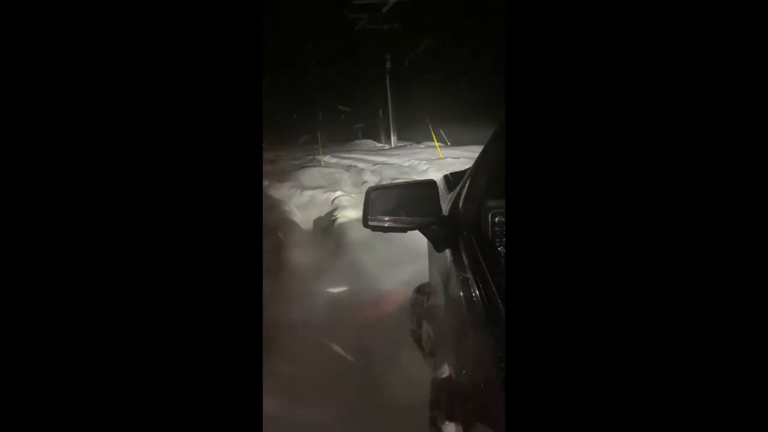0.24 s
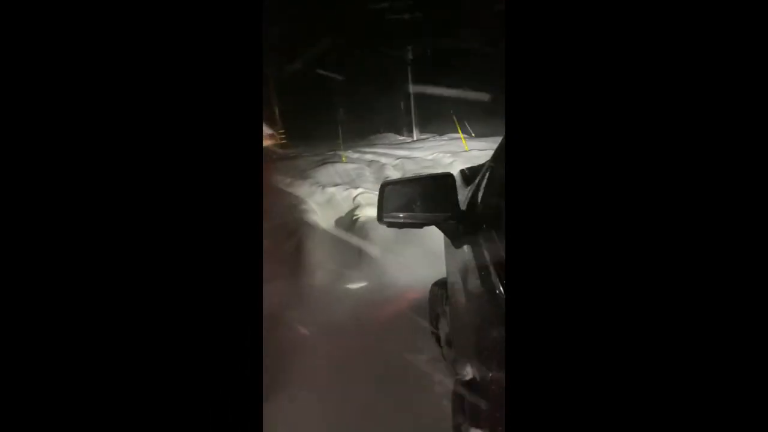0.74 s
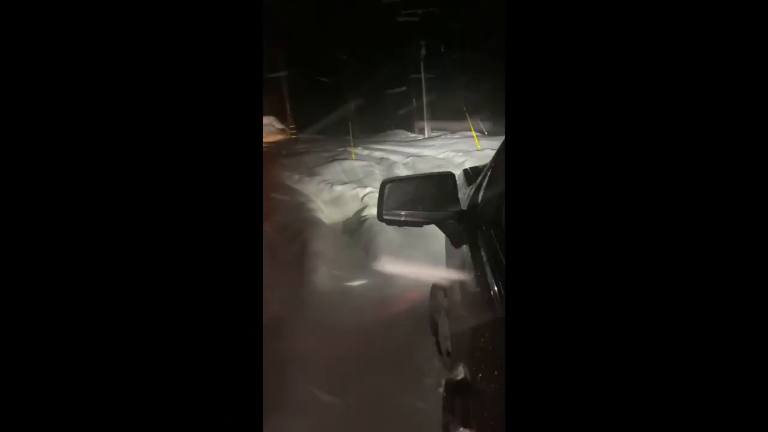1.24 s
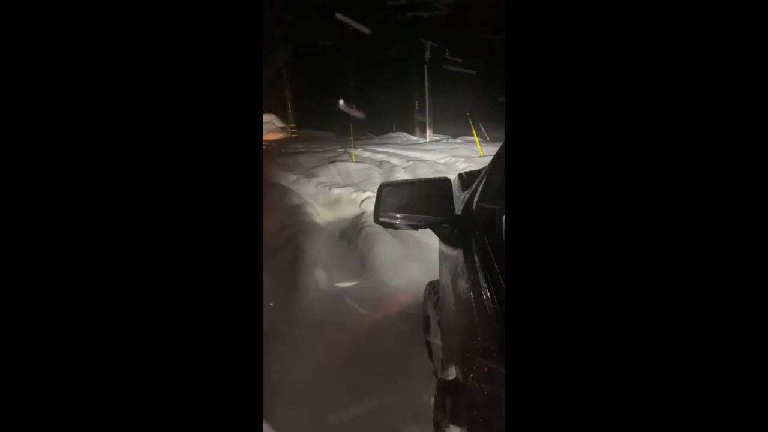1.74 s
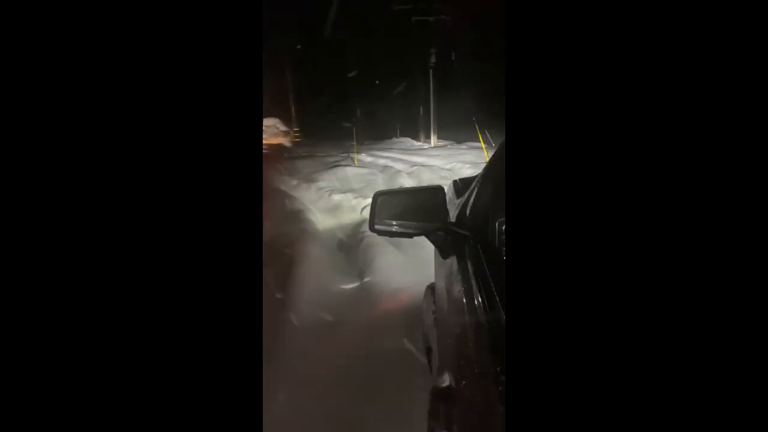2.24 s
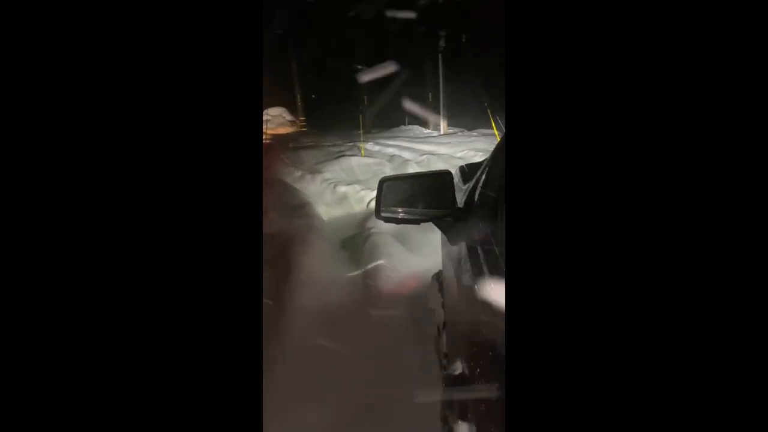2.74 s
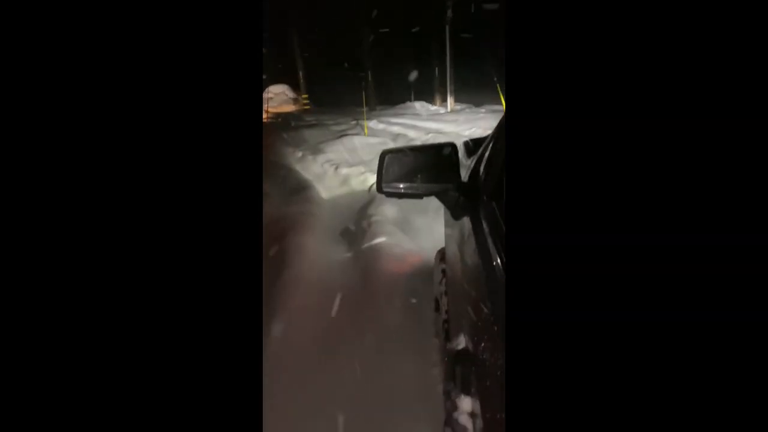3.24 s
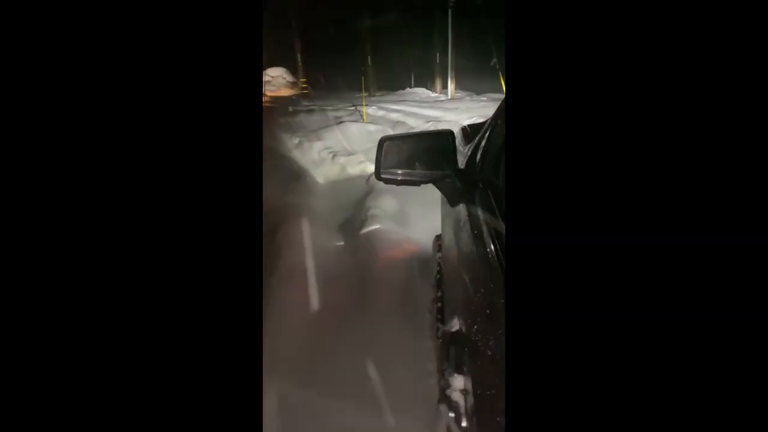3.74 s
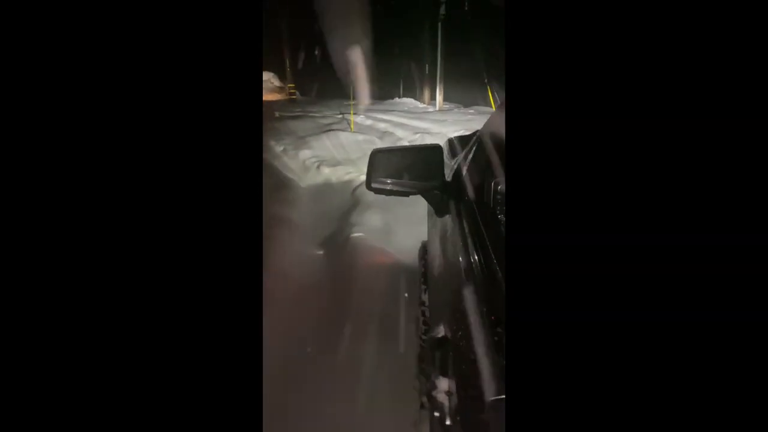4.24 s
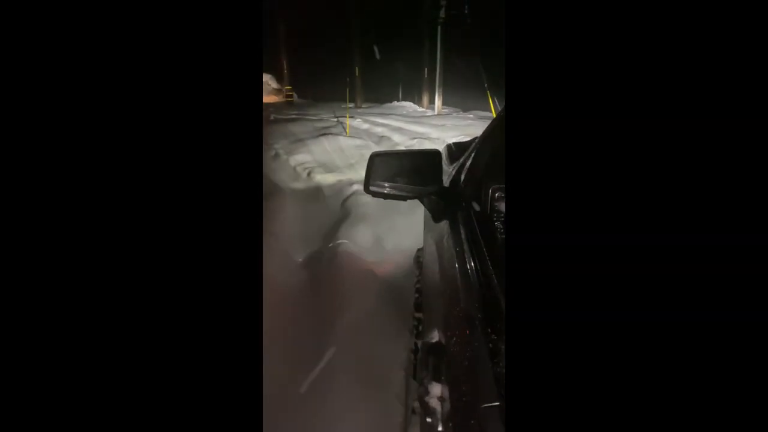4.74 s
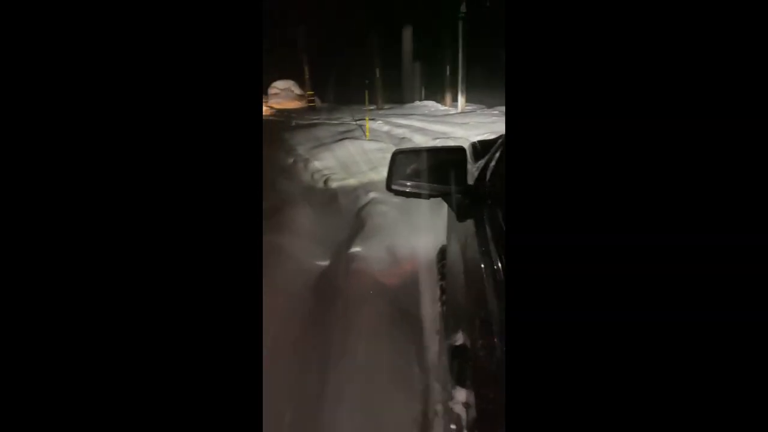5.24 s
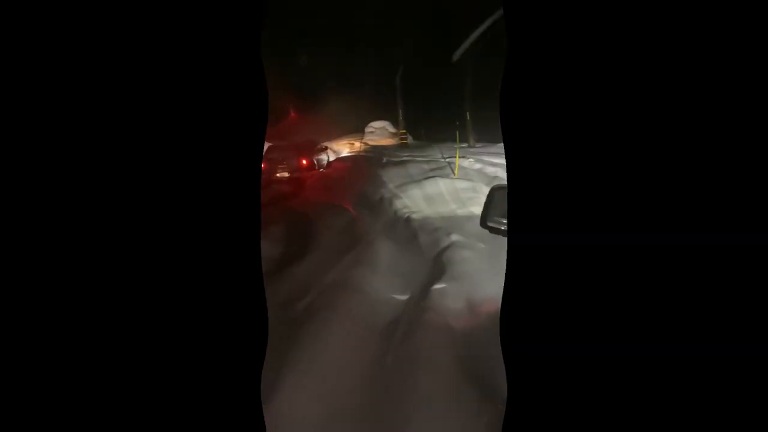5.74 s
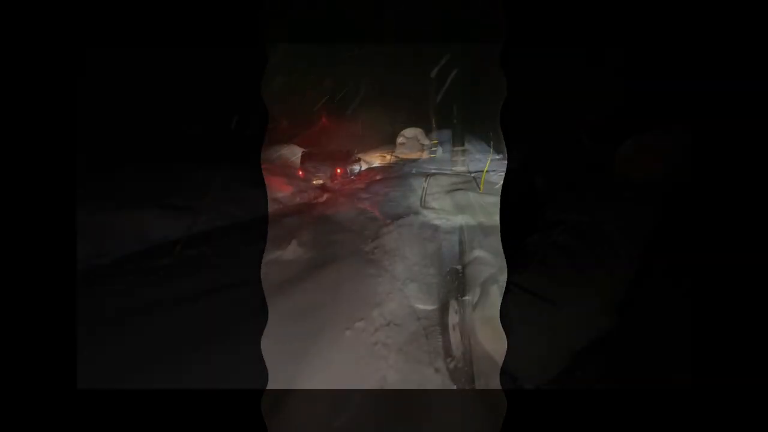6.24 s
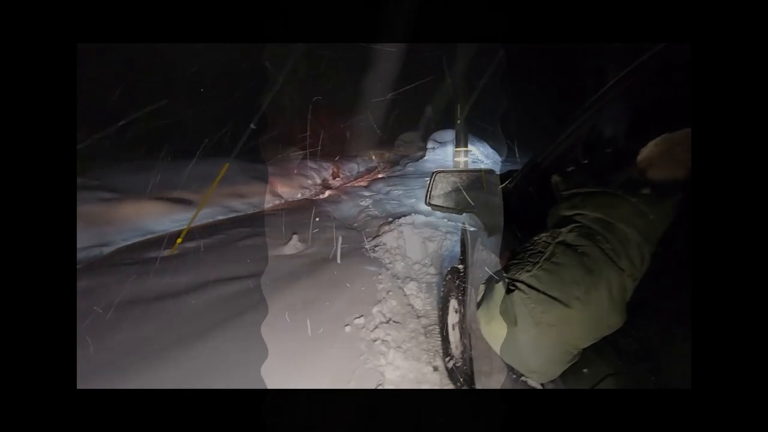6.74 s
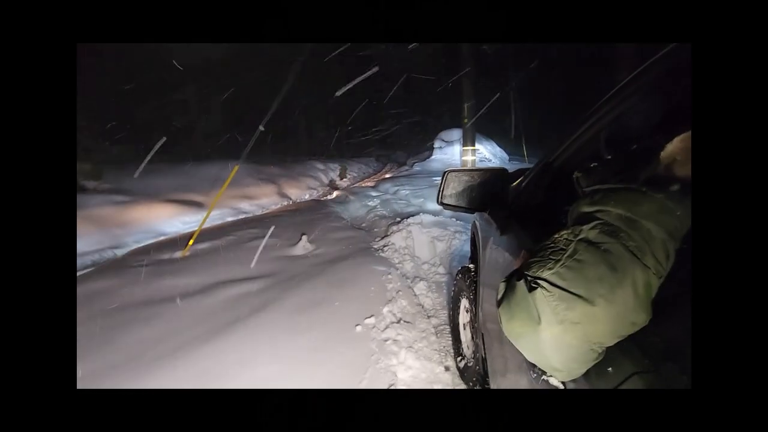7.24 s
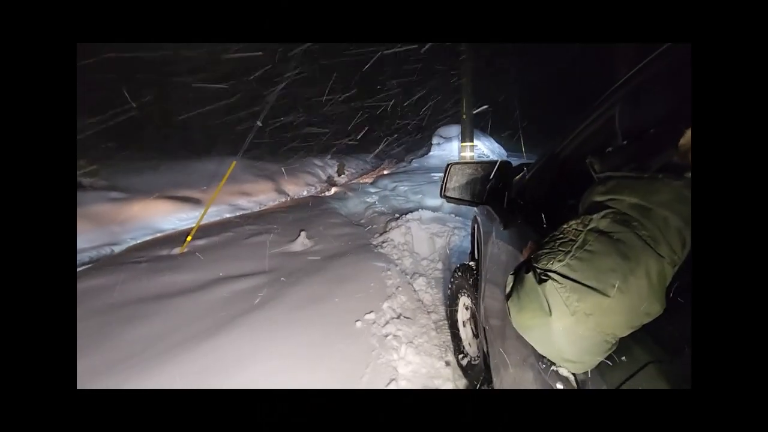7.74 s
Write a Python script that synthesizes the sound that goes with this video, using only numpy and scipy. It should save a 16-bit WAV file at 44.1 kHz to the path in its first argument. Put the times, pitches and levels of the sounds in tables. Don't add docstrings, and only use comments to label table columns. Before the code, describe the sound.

A pickup's exhaust hums and booms as it revs and bogs in deep snow under buffeting wind, then an abrupt click to quieter wind and cloth scuffs.

```python
import sys
import numpy as np
from scipy import signal
from scipy.fft import rfft, irfft
from scipy.io import wavfile
from scipy.ndimage import uniform_filter1d

SR = 44100
rng = np.random.default_rng(int(sys.argv[2]) if len(sys.argv) > 2 else 0)


def gain_from_db(level_db):
    decades = np.asarray(level_db, float) / 20
    return 10 ** decades


def to_wav(sig):
    pcm = np.clip(np.atleast_2d(sig), -1, 1) * 32767
    pcm = np.round(pcm).astype(np.int16)
    wavfile.write(sys.argv[1], SR, pcm.T)


N = 352359
T = np.arange(N) / SR
CUT_S, SPLICE_DB = 6.3432, -23.5

# (level [dB], rise with revs [dB per turn/s])
PHONE_LAYERS = [
    (-32, 0.09),
    (-41, 0.46),
    (-45, 0.26),
    (-58, 0.24),
]
CAMERA_LAYERS = [
    (-39, 0),
    (-44, 0.0045),
    (-45.5, 0.0054),
    (-65.5, 0),
]
# (frequency [Hz], level [dB per Hz])
BUFFET_COLOUR = [(14, -52), (30, -19), (50, 10.5), (90, 0), (140, -3), (200, -50), (400, -94)]
FLUTTER_COLOUR = [(50, -73), (100, -4.5), (150, 10.5), (250, 0), (350, -3), (500, -24), (1000, -86)]
PHONE_CHURN_COLOUR = [(220, -6), (380, -2), (498, -3), (856, -4), (929, -6), (1060, -7), (1410, -12.5),
                      (2010, -17.5), (2700, -33), (3510, -46), (5940, -120)]
CAMERA_CHURN_COLOUR = [(220, -2), (380, 0.5), (463, 2), (592, -4.5), (658, -1.5), (1080, -7), (1460, -10.5),
                       (2700, -28), (3510, -59), (5940, -120)]
PHONE_HISS_COLOUR = [(1470, -13.5), (2500, -2.5), (3980, -9.5), (5440, -12.5), (6010, -13.5), (6250, -9),
                     (8120, -57), (13800, -120)]
CAMERA_HISS_COLOUR = [(1500, -44), (2600, 2), (3500, -3), (5300, 1), (6700, -4), (7600, 1.5), (8500, -8),
                      (9500, -12.5), (10500, -23), (11800, -10), (13000, -16), (15500, -22), (15900, -58)]
# (frequency [Hz], left minus right [dB])
PHONE_PAIR = [
    [(40, .92), (90, .55), (180, .3), (300, .45), (600, .55), (1400, .5), (3000, .3), (5500, .5), (6500, .97)],
    [(100, 0), (260, .3), (520, 3.5), (860, 4.3), (2070, 6), (3000, 3.7), (5200, 0)],
    [(40, .3), (150, 3.5), (280, 8.5), (450, 7.5), (950, 5.5), (2380, 2.0), (5980, 0.0), (15000, 0.0)],
]
CAMERA_PAIR = [
    [(50, .85), (300, .8), (700, .6), (1500, .5), (3500, .4), (7000, .4), (14000, .8)],
    [(100, 0), (520, 0), (1120, 3.9), (1720, 4.5), (2500, 7.1), (3000, 9.2), (4050, 12.4), (6370, 18.8)],
    [(60, 0.5), (180, 0.0), (550, 0.5), (1650, 5), (4000, 3), (7500, -1), (15000, 0)],
]
# (middle [s], length [s], buffeting [dB], flutter [dB])
PHONE_GUSTS = [(0.132, 0.33, -8.5, -1), (.55, 0.23, 0.5, 6), (0.728, 0.093, 5, 4.5), (1.2, 0.86, 0, -2.5),
               (1.612, 0.035, 7, 1), (1.955, 0.15, 1.5, 3), (2.2, 0.31, 0, -1), (2.99, 0.43, -2.5, -1),
               (3.836, .4, 2.5, 1.5), (4.282, 0.15, 3, -1), (4.628, 0.054, 6, 5.5), (4.73, 0.029, 7, 9),
               (4.562, 0.71, 3, -3), (4.965, 0.065, 4.5, 2.5), (5.02, 0.039, -5, -1), (5.147, 0.18, 3, 3),
               (5.432, 0.27, 3, 5.5), (5.877, 0.2, 2.5, 0)]
CAMERA_GUSTS = [(6.39, 0.094, -4, -6), (6.66, 0.16, 6.5, 5), (6.88, 0.16, -2.5, -4.5), (7.05, .06, 2.5, -1),
                (7.2, 0.16, 7, 6), (7.38, 0.28, 2, 0.5), (7.52, .06, 1.5, 1), (7.63, 0.093, 6, 2),
                (7.83, 0.095, 9, 2.5), (7.96, 0.12, 3, 1.5)]
SPRAY_SHARE = 0.089
# (middle [s], length [s], level [dB])
SPRAY_SWELLS = [(.42, 0.27, 2), (3, 1.3, -0.5), (5.45, 0.69, -1.5), (6.5, 0.34, -1.5), (7.7, 1.1, 1)]
# (time [s], peak [dB], length [s], top frequency [Hz])
WIND_SLAPS = [(.5, -36, 0.056, 350), (4.1, -28, .015, 350), (4.184, -29, .015, 700),
              (4.266, -27, 0.013, 350), (4.286, -28, 0.014, 900), (4.335, -31, .015, 300),
              (4.409, -33, .015, 350), (4.466, -31, .02, 700), (4.532, -31, .01, 850),
              (4.572, -30, .012, 450), (4.64, -28, 0.018, 400), (4.681, -31, 0.014, 800),
              (4.748, -30, 0.019, 400), (4.832, -33, .02, 400), (4.945, -29, 0.013, 350),
              (4.966, -26.5, 0.017, 700), (4.99, -28, 0.014, 500), (5.065, -35, .015, 550)]
SLAP_LEAK = -0.59

# (time [s], length [s], centre [Hz], depth [dB], spread [log Hz])
GUARD_MUTES = [(4.29, .04, 300, 28, .5), (4.305, .035, 580, 32, .32), (4.53, .09, 570, 40, .18),
               (4.51, .025, 420, 14, .35), (4.57, .025, 400, 14, .3), (4.67, .06, 390, 34, .2),
               (4.785, .02, 380, 16, .35), (4.8, .04, 510, 22, .13), (4.84, .02, 250, 14, .3),
               (4.985, .04, 530, 32, .25), (5.005, .025, 260, 12, .35), (4.45, .07, 4000, 25, .12),
               (5.83, .09, 2520, 30, .05), (6.09, .22, 2980, 30, .035), (6.21, .06, 2700, 30, .11)]
# (frequency [Hz], share silent [0-1])
SHARED_HOLES = [(1500, .01), (2300, .08), (3000, .3), (4500, .27), (5800, .28), (6200, .5)]
# (frequency [Hz], share of patches heard [0-1])
TOP_KEPT = [(6250, .8), (6295, .8), (6350, .3), (6450, .05), (6850, .02), (6900, .015), (8200, .015),
            (8260, .7), (8340, .4), (8420, .08), (8750, .15), (8950, .7), (9300, .78), (9700, .9),
            (11300, .97), (11600, .6), (11800, 0)]
# (frequency [Hz], level [dB per Hz])
TOP_COLOUR = [(6250, 11), (6900, 19), (8250, 8), (9000, 2.5), (10000, -0.5), (11000, -1.5), (11800, -5.5)]
TOP_DB, TICK_DB = -70, -58.5
TICK_GAP = 1024
# (place in the gap [samples], level [dB], share of gaps [0-1])
TICK_PLACES = [
    (216, 0, 1),
    (760, -7, .12),
    (1000, -5, .3),
]
# (low [Hz], high [Hz], share of gaps [0-1])
TICK_BANDS = [
    (6300, 6900, .25),
    (6900, 7600, .99),
    (7600, 8250, .8),
]
# (frequency [Hz], level [dB])
THIN_LINES = [(6293, -74.5), (6902, -80), (8258, -77), (8953, -83)]
# (middle [s], length [s], level [dB])
TOP_SWELLS = [(.5, 0.18, 3), (1.75, .55, 2.5), (5.4, 0.71, -1.5)]
# (time [s], peak [dB])
PHONE_FLAKES = [(0.9546, -55), (1.5978, -57), (2.2288, -48), (2.7621, -49), (3.03, -46.5), (3.8186, -64),
                (5.53, -49)]

# (time [s], peak [dB], length [s], hollow ring [dB], ring [Hz])
JACKET_SCUFFS = [
    (6.735, -41, 0.019, -38, 1540),
    (6.85, -52.5, 0.016, -54, 1650),
    (6.977, -46, 0.02, -41.5, 1490),
    (7.196, -37.5, 0.015, -40.5, 1540),
    (7.809, -68, 0.032, -39.5, 1230),
]
# (low [Hz], high [Hz], level [dB])
CLOTH_COLOUR = [(450, 960, 4), (1980, 2500, -4.5), (3420, 4600, -0.5), (5400, 6500, -2), (7500, 8600, -3),
                (9000, 13500, -13)]
RING_SPREAD = 0.069
# (time [s], peak [dB], length [s], low [Hz], high [Hz])
CAMERA_FLAKES = [(6.703, -43, .0012, 4000, 15500), (6.795, -55, .001, 7000, 14500),
                 (6.8217, -48, .0012, 4500, 15500), (6.982, -49, .012, 11400, 12900),
                 (7.05, -52, .001, 10500, 13000), (7.297, -52, .0015, 4000, 7000),
                 (7.301, -52, .001, 11500, 14000), (7.307, -42, .0012, 5000, 14500),
                 (7.338, -56, .001, 8000, 12500), (7.371, -46, .003, 2800, 9000),
                 (7.437, -54, .003, 3500, 5500), (7.4906, -44, .001, 4800, 15600),
                 (7.5078, -52, .002, 5500, 8000), (7.5377, -40, 0.00098, 2600, 15600),
                 (7.573, -46, .0012, 5000, 12500), (7.706, -56, .001, 7500, 10500),
                 (7.918, -54, .012, 3880, 5000), (7.162, -52, 0.0016, 600, 2500),
                 (7.953, -52, .002, 7000, 11000), (7.966, -52, .008, 3000, 15000),
                 (7.205, -24, 0.013, 70, 260), (7.202, -34, 0.011, 480, 636), (7.82, -27, 0.015, 70, 330),
                 (6.735, -36, 0.012, 280, 555)]
FLAKE_PAN_DB = 2
# (frequency [Hz], level [dB])
CLOSE_COLOUR = [(3000, 0.5), (7500, 3), (10200, -10), (12300, -7), (15500, -12)]
# (middle [s], length [s], frequency [Hz], level [dB])
ENGINE_MOANS = [(7.12, 0.14, 335, -45), (7.12, 0.26, 98, -41), (7.4, .14, 452, -49), (7.65, 0.14, 110, -35),
                (6.82, .06, 410, -47), (7.217, 0.027, 115, -24), (7.836, 0.043, 105, -27.5),
                (7.93, .1, 111, -37)]
# (time [s], frequency [Hz], level [dB])
GEAR_WHINE = [(7.15, 660, -65), (7.23, 659, -54.5), (7.8, 666, -61), (7.87, 660, -64), (7.95, 668, -53)]

# (time [s], crank speed [turns/s])
CRANK_SPEED = [(0, 34), (.26, 27.4), (.5, 25.3), (.7, 29.4), (.9, 31.1), (1.27, 32.7), (1.73, 34.1),
               (1.94, 33.1), (2.27, 26.2), (2.65, 26.8), (3.14, 29.9), (3.45, 33.2), (3.83, 34.8),
               (4.2, 34), (4.65, 27.6), (5.02, 26.6), (5.45, 31.9), (5.84, 33.8), (6.34, 35.1)]
MID_TURNS = 30
# (middle [s], length [s], level above the hum [dB])
EXHAUST_BOOMS = [(.41, 0.34, 16), (.76, 0.019, 21.5), (.93, 0.106, 7.5), (1.3, 0.38, -12),
                 (1.62, 0.056, 14), (1.76, 0.06, 4), (2.1, 0.58, 13), (2.46, 0.15, 1.5),
                 (2.64, 0.085, 13.5), (2.95, 0.29, 4.5), (3.45, .2, 4), (3.72, 0.36, 8.5), (4.12, 0.36, 12),
                 (4.47, 0.091, 10.5), (4.82, 0.66, 7.5), (5.27, 0.56, 1.5), (5.9, 0.33, 3),
                 (6.26, 0.33, 11.5)]
HUM_DB = -42.5
# (down [s], up [s], level above coasting [dB])
THROTTLE_PRESSES = [
    (-.3, .15, 6),
    (.6, 2.05, 7.5),
    (3.0, 4.36, 9.5),
    (5.15, 6.6, 8),
]
COAST_DB, PEDAL_S = -51, .6
# (multiple of crank speed, level [dB], left minus right [dB])
EXHAUST_TONES = [(1, -4, 2), (1.5, 4, 2), (2, -1, 2), (2.5, -3, 2), (4.5, -3, 3), (5, -9, 4), (6, 2.5, 6),
                 (7, -5, 6), (7.5, -10, 10), (8.5, -6, 13), (9, 0, 13), (10, -1.5, 18), (10.5, -10, 6),
                 (12, -13, 10)]
# (multiple of crank speed, level [dB], left minus right [dB])
VALVE_TONES = [(16.5, -14, 10), (18, -12, 12), (19, -14, 10), (19.5, -15, 10), (21, -9.5, 12),
               (22.5, -14, 8), (25, -12, 6), (25.5, -9, 6), (28, -11, 8), (30, -16, 8), (31, -15, 8),
               (33, -16, 8)]


def evened(x):
    return x / np.sqrt(np.mean(x ** 2) + 1e-20)


def read(points, hz):
    f, value = np.transpose(points)
    return np.interp(np.log(hz + 1), np.log(f + 1), value)


def columns(rows, t):
    s, *values = np.transpose(rows)
    return [np.interp(t, s, v) for v in values]


def bumps(rows):
    return sum(np.outer(high, np.exp(-(2 * (T - s) / length) ** 4)) for s, length, *high in rows)


def drift(width_s):
    size = int(width_s * SR / 64) + 1
    slow = uniform_filter1d(uniform_filter1d(rng.standard_normal(N // 64 + 2), size), size)
    return np.interp(np.arange(N) / 64, np.arange(len(slow)), evened(slow))


def dropped(shape, share, bins, frames):
    chance = uniform_filter1d(rng.standard_normal(shape), size=bins, axis=0)
    chance = evened(uniform_filter1d(chance, size=frames, axis=1))
    return 1 / (1 + np.exp(-1.7 * chance)) < share


def band(x, low_hz, high_hz, order=4):
    return signal.sosfilt(signal.butter(order, [low_hz, high_hz], "band", fs=SR, output="sos"), x)


def low_pass(x, top_hz, taps=257):
    return signal.oaconvolve(x, signal.firwin(taps, top_hz, fs=SR)[None], "same")


def add(mix, s, sound):
    part = mix[:, round(s * SR):][:, :sound.shape[1]]
    part += sound[:, :part.shape[1]]


def noise(shape, pair, patchy_db, flicker_db, skip, size=1024):
    frames, hz = 4 * (N - skip) // size + 5, np.fft.rfftfreq(size, 1 / SR)
    a, b, c, d, patches = rng.standard_normal((frames, len(hz), 5)).T
    patches = evened(uniform_filter1d(uniform_filter1d(patches, size=9, axis=0), size=9, axis=1))
    flicker = evened(uniform_filter1d(rng.standard_normal(frames), size=3))
    same, lead, lean_db = (read(p, hz)[:, None] for p in pair)
    same = np.clip(same, 0, 1)
    left = a + 1j * b
    right = same * left * np.exp(-1j * lead) + np.sqrt(1 - same ** 2) * (c + 1j * d)
    z = np.array([left * gain_from_db(lean_db / 2), right / gain_from_db(lean_db / 2)])
    z *= gain_from_db(read(shape, hz)[:, None] + patchy_db * patches + flicker_db * flicker)
    x = signal.istft(z, nperseg=size, noverlap=3 * size // 4)[1][:, :N - skip]
    return np.pad(x / np.sqrt(np.mean(x.mean(0) ** 2)), [(0, 0), (skip, 0)])


def outdoors(layers, gusts, churn, hiss, pair, skip=0):
    base_db, slope = np.transpose(layers)[:, :, None]
    low_db, flap_db = bumps(gusts)
    levels_db = base_db + slope * (columns(CRANK_SPEED, T)[0] - MID_TURNS)
    spray_db = SPRAY_SHARE * flap_db
    buffet_db, flutter_db, churn_db, hiss_db = levels_db + [low_db, flap_db, spray_db, spray_db]
    hiss_db = hiss_db + bumps(SPRAY_SWELLS)[0]
    x = gain_from_db(buffet_db) * noise(BUFFET_COLOUR, pair, patchy_db=0.5, flicker_db=-0.45, skip=skip, size=2048)
    x += gain_from_db(flutter_db) * noise(FLUTTER_COLOUR, pair, patchy_db=1.5, flicker_db=0.0, skip=skip)
    x += gain_from_db(churn_db) * noise(churn, pair, patchy_db=1.0, flicker_db=0.8, skip=skip)
    return x + gain_from_db(hiss_db) * noise(hiss, pair, patchy_db=1.0, flicker_db=-0.27, skip=skip, size=512)


def wind_slap(peak_db, length, top_hz):
    t = np.arange(int(4 * length * SR)) / SR
    lump = signal.lfilter([1], [1, -np.exp(-2 * np.pi * 120 / SR)], rng.standard_normal(len(t)))
    swell = np.exp(-((t - 1.6 * length) / length) ** 2)
    thump = evened(band(lump, 89, top_hz, order=2)) * swell
    return gain_from_db(peak_db - 4) * thump * np.array([[np.clip(SLAP_LEAK, -1, 0)], [1]])


def wind_guard(x):
    hz, t, z = signal.stft([x[0] + x[1], x[0] - x[1]], SR, nperseg=1024, noverlap=896)
    for s, length, centre_hz, depth_db, spread in GUARD_MUTES:
        near = abs(t - s) < length
        in_time = (2 * (t[near] - s) / length) ** 4
        in_pitch = (np.log((hz[:, None] + 1) / centre_hz) / spread) ** 4
        z[0][:, near] /= gain_from_db(depth_db * np.exp(-in_time - in_pitch))
    lost = read(SHARED_HOLES, hz) * (hz > SHARED_HOLES[0][0])
    z[0] *= ~dropped(z[0].shape, lost[:, None], bins=4, frames=20)
    z = z * (hz < TOP_KEPT[0][0])[:, None]
    mid, side = signal.istft(z, SR, nperseg=1024, noverlap=896)[1][:, :N]
    return np.array([mid + side, mid - side]) / 2


def top_hiss():
    hz, t, z = signal.stft(rng.standard_normal(N), SR, nperseg=1024, noverlap=768)
    share = read(TOP_KEPT, hz) * (hz >= TOP_KEPT[0][0])
    kept = dropped(z.shape, share[:, None], bins=3, frames=12)
    z = z * kept * gain_from_db(read(TOP_COLOUR, hz))[:, None]
    return gain_from_db(TOP_DB) * evened(signal.istft(z, SR, nperseg=1024, noverlap=768)[1][:N])


def thin_lines():
    x = np.zeros(N)
    for line_hz, db in THIN_LINES:
        strength = np.clip(drift(0.023) + .5, 0, 2)
        x += gain_from_db(db) * strength * np.sin(2 * np.pi * line_hz * T + 1.2 * drift(.04))
    return x


def regular_ticks():
    gaps = N // TICK_GAP + 1
    ticks, x = np.zeros(gaps * TICK_GAP), np.zeros(N)
    for at, db, share in TICK_PLACES:
        weaker, sign, happens = rng.random((gaps, 3)).T
        ticks[at::TICK_GAP] = gain_from_db(db - 4.5 * weaker ** 2) * np.sign(sign - .5) * (happens < share)
    for low_hz, high_hz, share in TICK_BANDS:
        on = np.repeat(dropped((1, gaps), share, bins=1, frames=3)[0], TICK_GAP)
        shape = signal.firwin(641, [low_hz, high_hz], pass_zero=False, fs=SR)
        x += gain_from_db(TICK_DB) * signal.oaconvolve((ticks * on)[:N], shape / shape.max(), "same")
    return x


def phone_top():
    level_db = 0.23 * (columns(CRANK_SPEED, T)[0] - MID_TURNS) + bumps(TOP_SWELLS)[0] + 0.1
    return gain_from_db(level_db) * (top_hiss() + thin_lines() + regular_ticks())


def puff(peak_db, length, low_hz, high_hz, pan_db=0, order=2):
    t = np.arange(int(4 * length * SR) + 64) / SR
    a, b = rng.standard_normal((2, len(t)))
    burst = band(np.array([a + 0.56 * b, a - 0.2 * b]), low_hz, high_hz, order=order)
    shape = np.minimum(t / (.5 * length), 1) * np.exp(-(t / (1.52 * length)) ** 3)
    return gain_from_db(peak_db - 7.0) * evened(burst) * shape * gain_from_db(np.array([[pan_db / 2], [-pan_db / 2]]))


def gear_whine():
    hz, db = columns(GEAR_WHINE, T)
    start = np.clip((T - GEAR_WHINE[0][0]) / .06, 0, 1)
    level = start * gain_from_db(db + 3.5 + 4 * drift(.035))
    return level * np.sin(2 * np.pi * np.cumsum(hz) / SR + .8 * drift(.03))


def moans():
    x = np.zeros(N)
    for s, length, hz, db in ENGINE_MOANS:
        swell = np.exp(-(2 * (T - s) / length) ** 2)
        x += gain_from_db(db) * swell * np.sin(2 * np.pi * hz * T + 0.5 * drift(.04))
    return x


def jacket_scuffs():
    x = np.zeros((2, N))
    for s, db, length, ring_db, ring_hz in JACKET_SCUFFS:
        for low_hz, high_hz, cloth_db in CLOTH_COLOUR:
            rub_s = length * rng.uniform(.7, 1.1)
            add(x, s - .005, puff(db + cloth_db - 4.0, rub_s, low_hz, high_hz))
        clear = ring_hz > 1300
        wide = 1 + RING_SPREAD + .25 * (ring_hz < 1300)
        add(x, s - .001, puff(ring_db - 2 * clear, 0.6 * length, ring_hz / wide, ring_hz * wide))
        swell = np.exp(-((T - s - 0.55 * length) / (.5 * length)) ** 2)
        x += clear * gain_from_db(ring_db - 9) * swell * np.sin(2 * np.pi * ring_hz * T)
    return x


def camera_flakes():
    close = np.zeros((2, N))
    for s, db, length, low_hz, high_hz in CAMERA_FLAKES:
        add(close, s, puff(db, length, low_hz, high_hz, FLAKE_PAN_DB * (low_hz > 1000), order=3))
    return irfft(rfft(close) * gain_from_db(read(CLOSE_COLOUR, np.fft.rfftfreq(N, 1 / SR))), N)


def engine_tones(rows, turn, load_db):
    x = np.zeros((2, N))
    for k, db, lean_db in rows:
        level = gain_from_db(load_db + db + 2.5 * drift(.15) - np.array([[0], [lean_db]]))
        start_turns = rng.random() + np.array([[0], [min(k / 20, .4)]])
        wobble = (.1 + .022 * k) * drift(.08)
        x += level * np.sin(k * turn + 2 * np.pi * start_turns + wobble)
    return x


def engine():
    turn = 2 * np.pi * np.cumsum(columns(CRANK_SPEED, T)[0]) / SR
    load_db = np.full(N, float(COAST_DB))
    for down, up, db in THROTTLE_PRESSES:
        pressed = np.minimum((T - down) / PEDAL_S, 3 * (up - T) / PEDAL_S)
        load_db += db * np.clip(pressed, 0, 1)
    hum = np.sqrt(2) * gain_from_db(HUM_DB + bumps(EXHAUST_BOOMS)[0] + 0.5) * np.sin(3 * turn)
    puffs = (1 + 1.3 * np.sin(3 * turn)) * rng.standard_normal(N)
    growl = gain_from_db(load_db - 11.5) * evened(band(puffs, 595, 1100, order=2))
    left = hum * gain_from_db(1.6) + 1.5 * growl
    right = np.roll(hum, shift=24) / gain_from_db(1.6) - .3 * growl
    tones = gain_from_db(2.5) * engine_tones(EXHAUST_TONES, turn, load_db)
    whirr = gain_from_db(1) * engine_tones(VALVE_TONES, turn, load_db)
    return np.array([left, right]) + tones + whirr


def camera():
    x = outdoors(CAMERA_LAYERS, CAMERA_GUSTS, CAMERA_CHURN_COLOUR, CAMERA_HISS_COLOUR, CAMERA_PAIR, skip=6 * SR)
    dull = low_pass(x, 10000)
    x = dull + (x - dull) * np.interp(T, [6.4, 6.68, 6.72, 7.3], [.4, .45, .8, 1.1])
    x = x + jacket_scuffs() + camera_flakes() + moans()
    return low_pass(x, 15750) + gear_whine()


def phone():
    x = outdoors(PHONE_LAYERS, PHONE_GUSTS, PHONE_CHURN_COLOUR, PHONE_HISS_COLOUR, PHONE_PAIR)
    for s, *row in WIND_SLAPS:
        add(x, s - .01, wind_slap(*row))
    x = wind_guard(x + engine()) + phone_top()
    for s, db in PHONE_FLAKES:
        add(x, s, puff(db - 3, .008, 7800, 11200, order=8))
    return x


def scene():
    after = np.clip((T - CUT_S) / .001, 0, 1)
    step = gain_from_db(SPLICE_DB) * (T > CUT_S) * np.exp(-abs(T - CUT_S) / 0.00085)
    end = np.clip((T[-1] - T) / .003, .2, 1)
    return (1 - after) * phone() + after * end * camera() + step


def top_cut(x):
    return signal.sosfilt(signal.butter(12, 16580, fs=SR, output="sos"), x)


def record(dry):
    x = signal.sosfilt(signal.butter(N=2, Wn=30, btype="high", fs=SR, output="sos"), dry)
    x = low_pass(x, 16400, taps=255)
    return top_cut(x)


dry = scene()
out = record(dry)
to_wav(out)
```